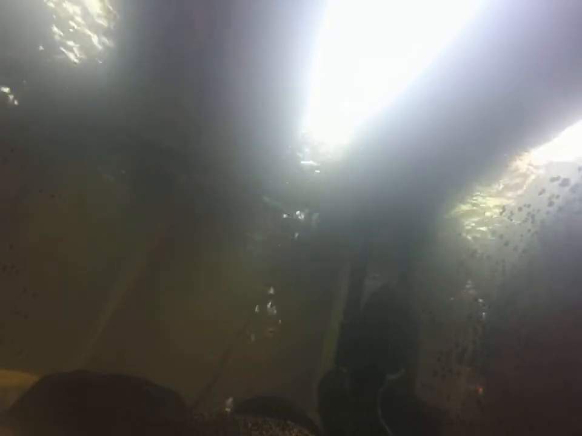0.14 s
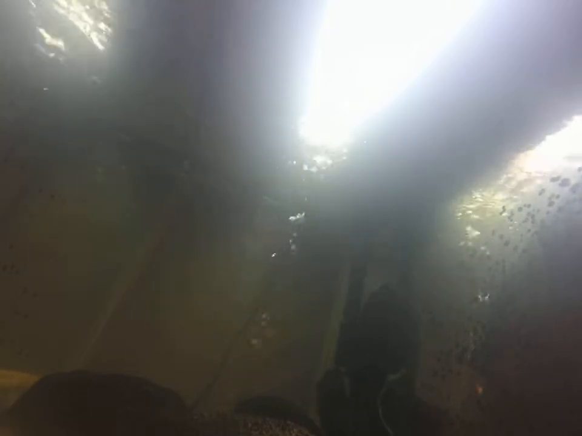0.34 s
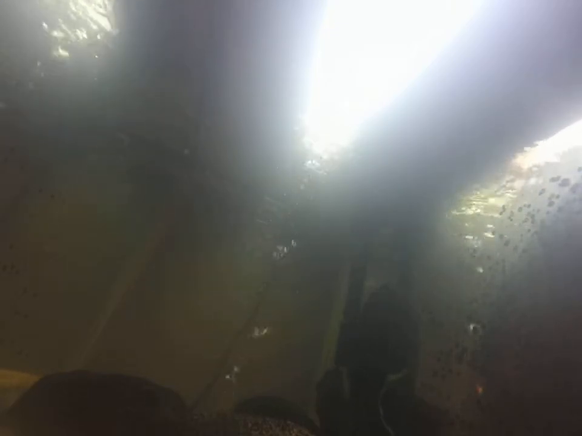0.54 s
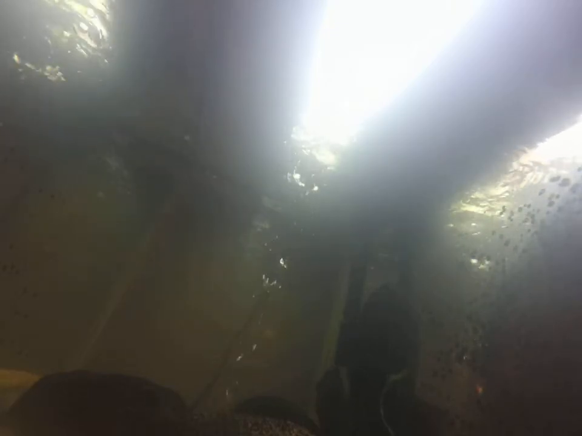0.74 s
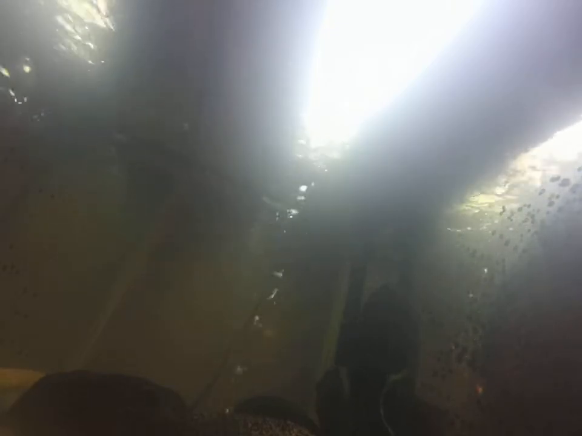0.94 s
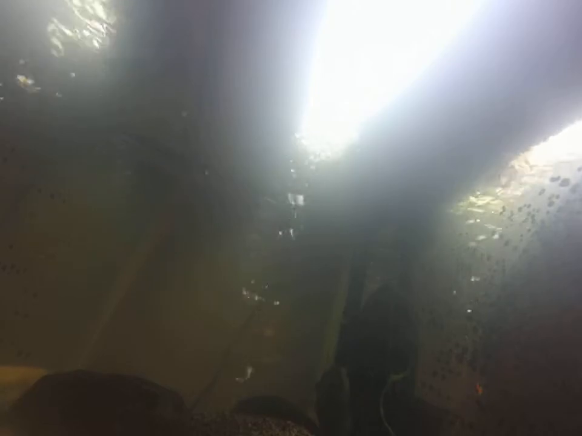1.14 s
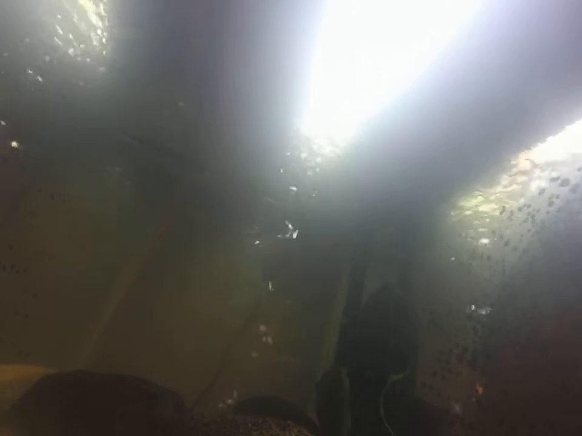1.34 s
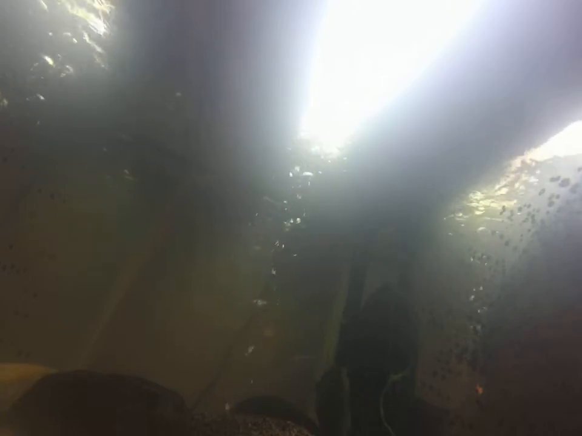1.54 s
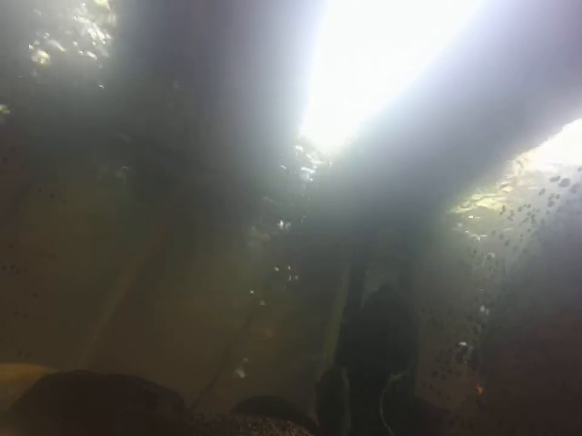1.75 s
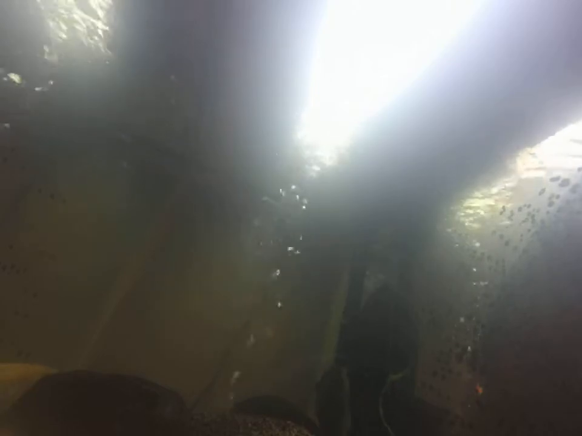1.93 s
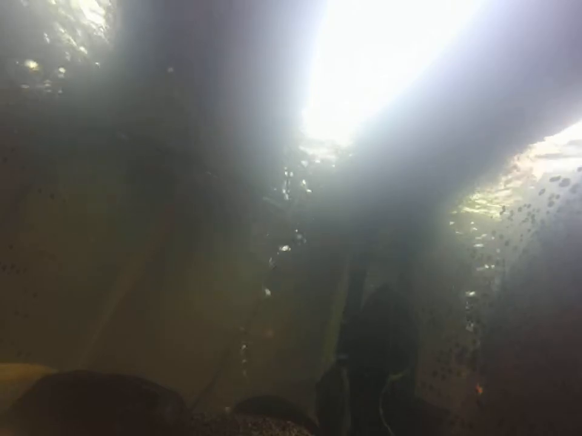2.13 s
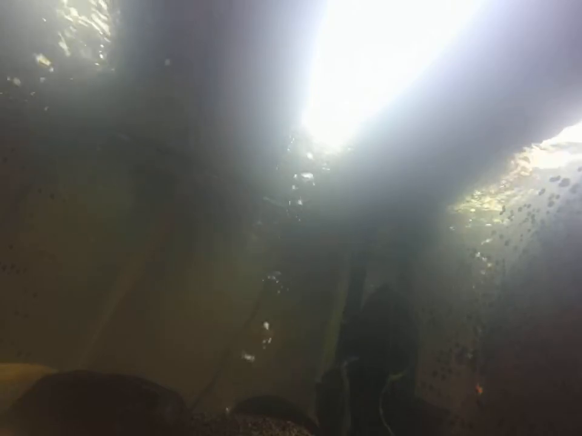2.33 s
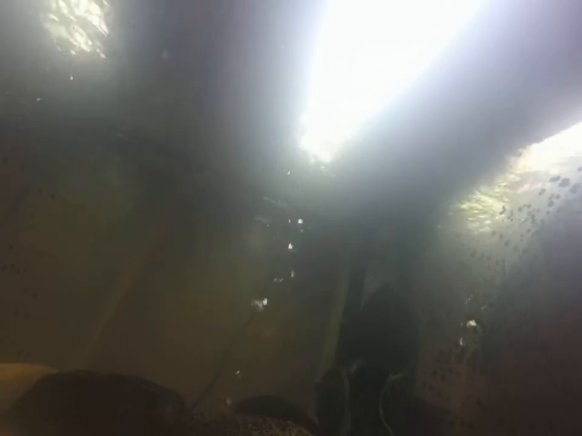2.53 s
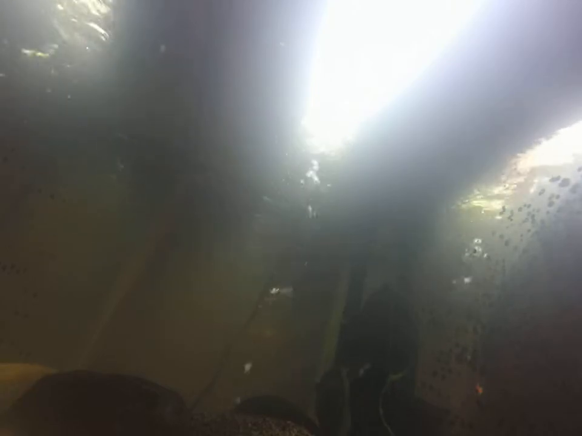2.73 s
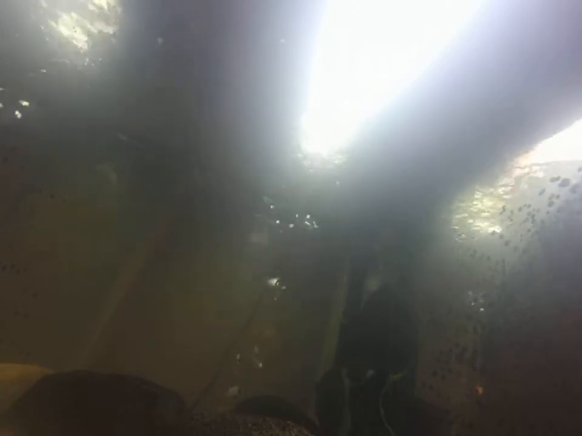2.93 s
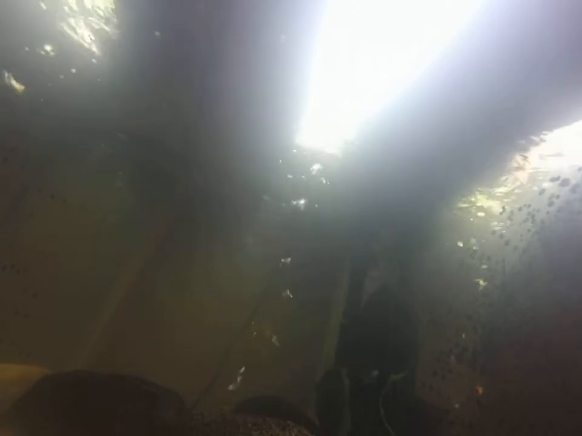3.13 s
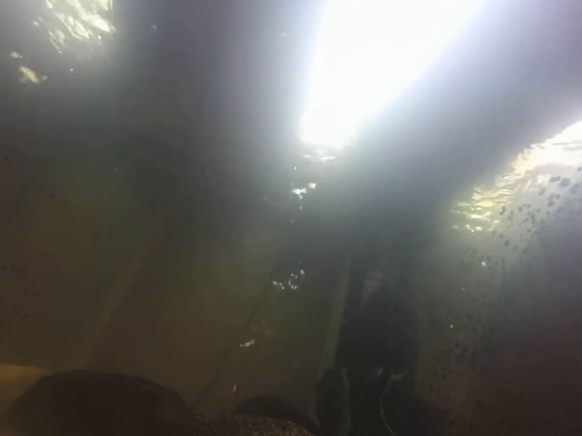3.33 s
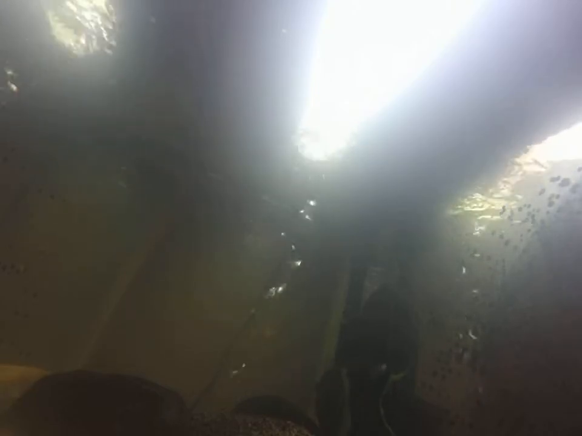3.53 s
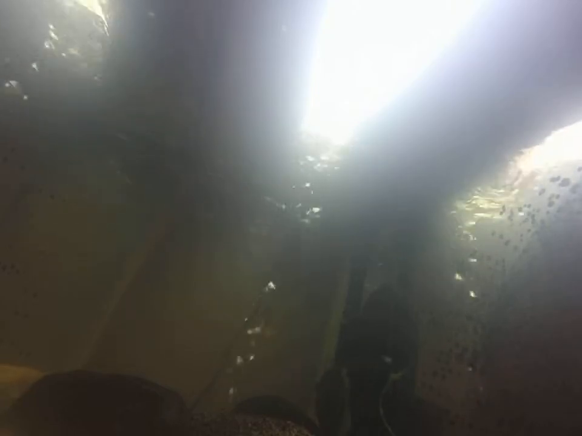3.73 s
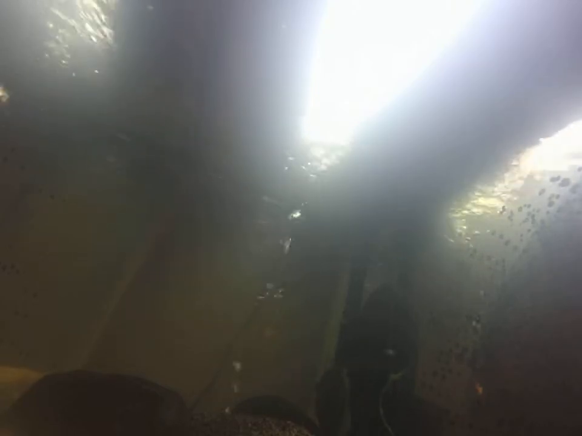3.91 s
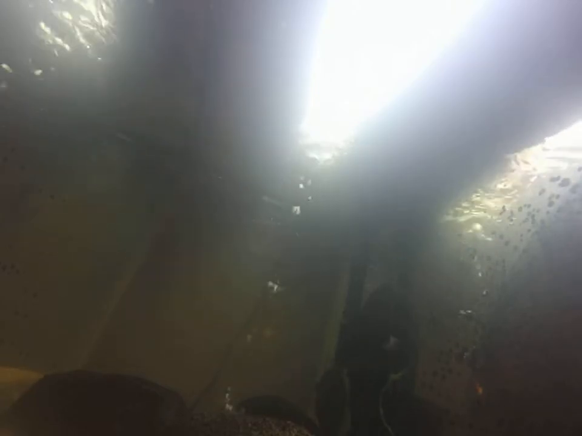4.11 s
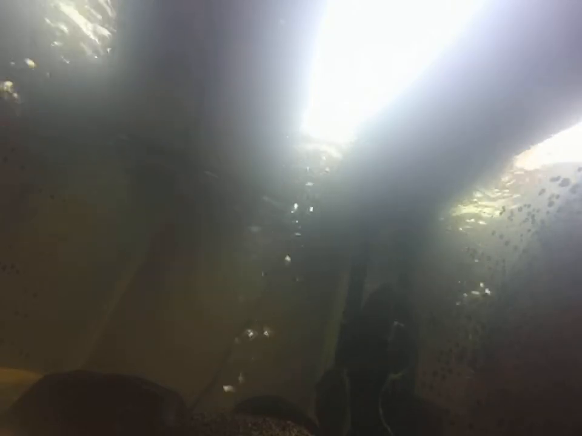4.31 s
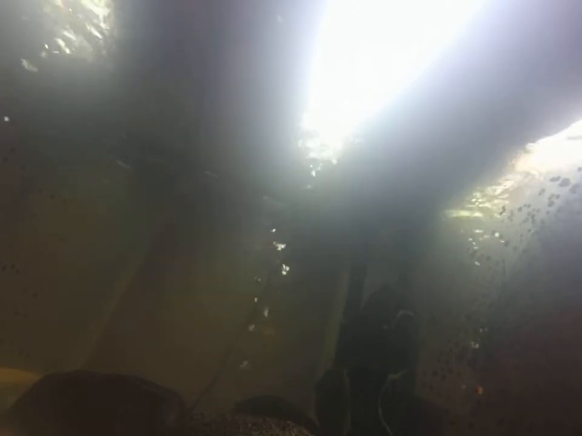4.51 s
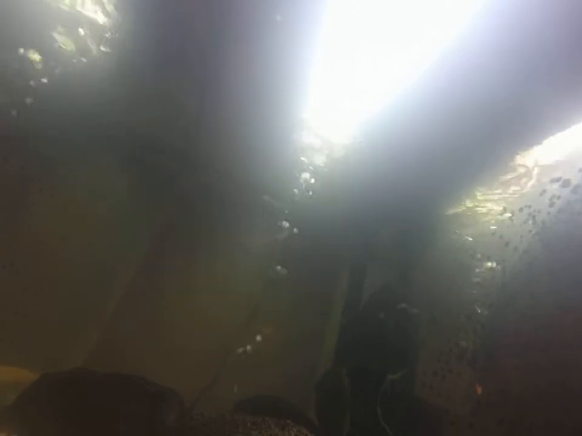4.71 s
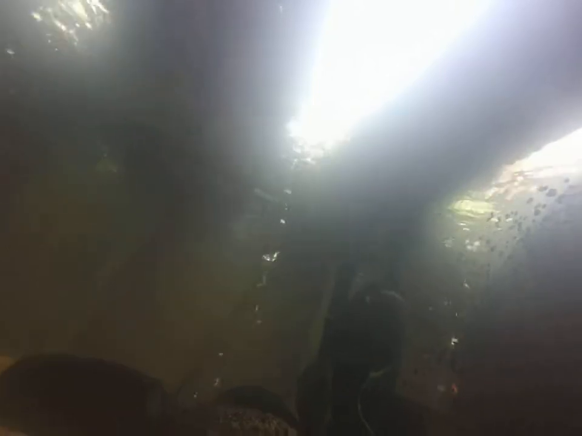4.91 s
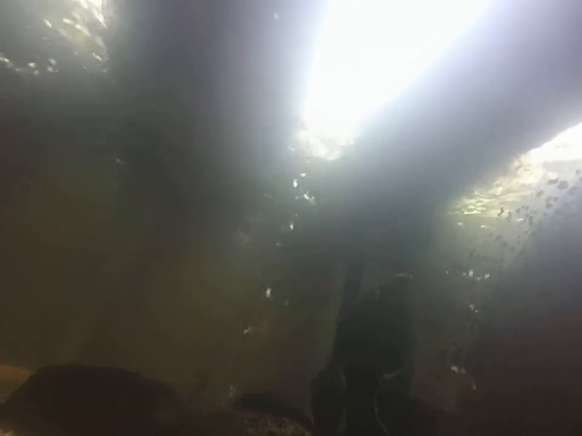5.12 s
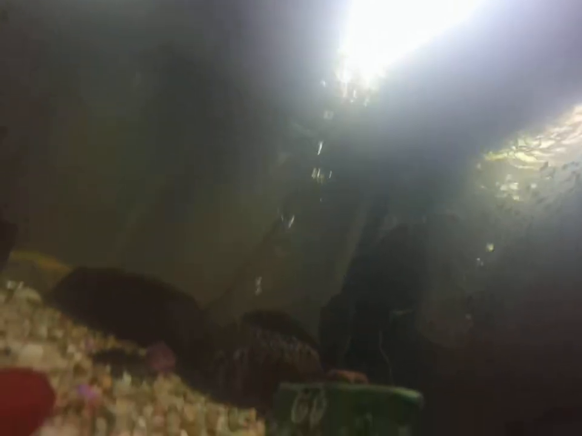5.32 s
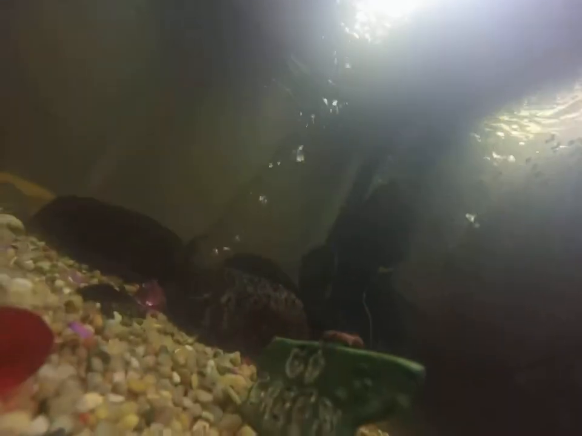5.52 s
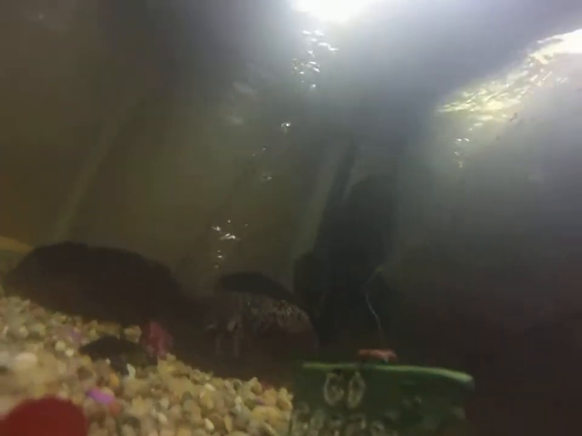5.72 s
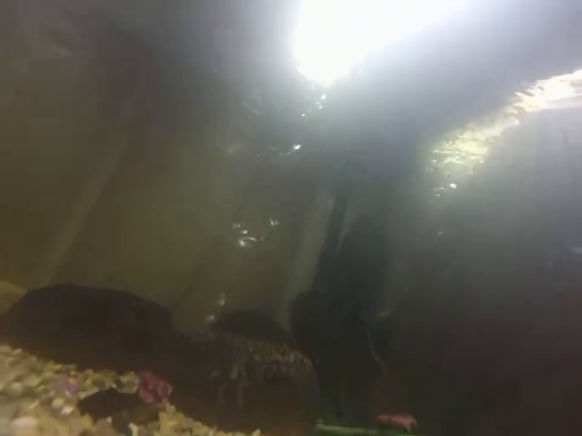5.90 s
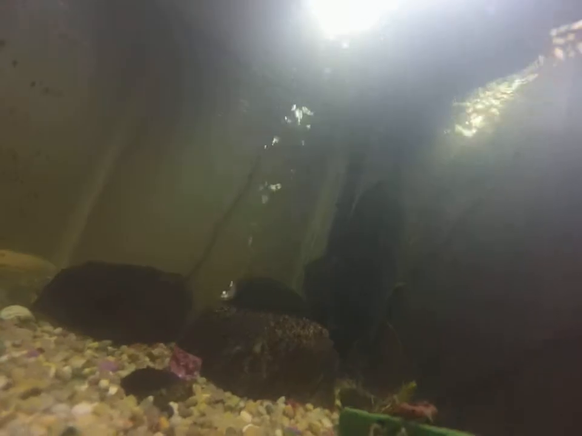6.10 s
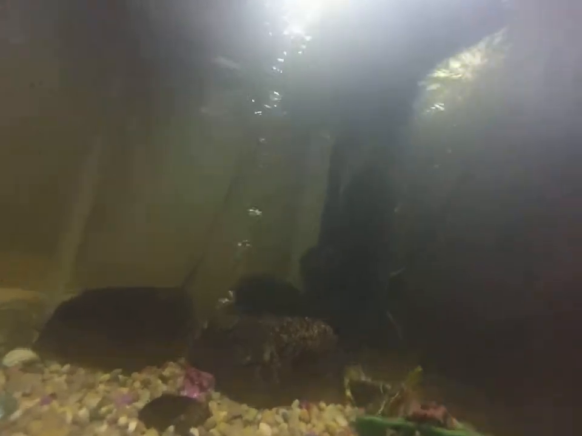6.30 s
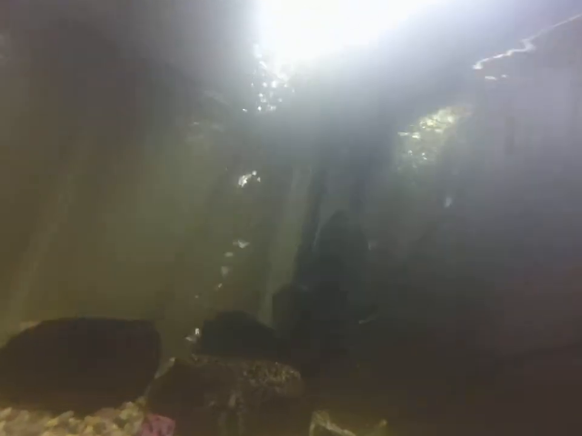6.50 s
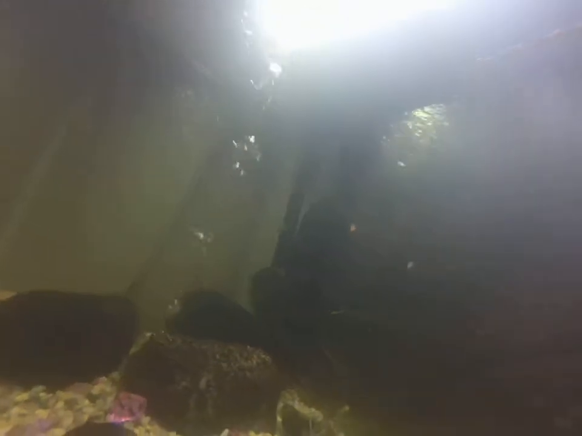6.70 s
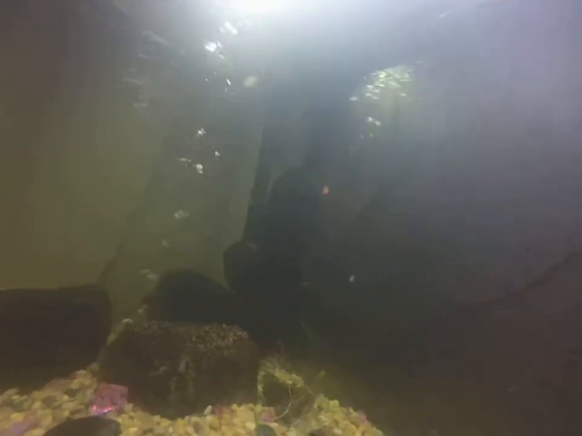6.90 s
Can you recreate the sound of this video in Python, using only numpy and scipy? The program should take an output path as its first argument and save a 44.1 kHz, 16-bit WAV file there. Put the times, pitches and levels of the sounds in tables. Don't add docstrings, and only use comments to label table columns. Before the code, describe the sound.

A microphone in a waterproof case lies on a fish tank's gravel. An air stone releases bright, irregular plinks, with occasional low gurgles, while a pump hums steadily and water rumbles. Soft bumps precede rough scraping and stone clicks, a hard knock chattering down, and a short violent crunch. Afterwards the muted bubbling and hum swell back.

```python
import sys
import numpy as np
from scipy import signal
from scipy.fft import rfft, irfft
from scipy.io import wavfile
from scipy.ndimage import uniform_filter1d

SR = 44100
rng = np.random.default_rng(int(sys.argv[2]) if len(sys.argv) > 2 else 0)


def amplitude_ratio(level_db):
    exponent = np.asarray(level_db, float) / 20
    return 10 ** exponent


def master(y):
    cut = np.clip(np.atleast_2d(y).T, -1, 1)
    pcm = np.round(cut * 32767)
    wavfile.write(sys.argv[1], SR, pcm.astype(np.int16))


N = 306495
TIME = np.arange(N) / SR

# f/Hz, level/dB, t60/s
TANK_MODES = [(2540, -29, 0.026), (3100, -1, 0.028), (3602, -4.5, 0.047), (4370, -2, 0.04),
              (4814, -7, 0.041), (4980, -19, 0.058), (5380, -3, 0.025), (5640, -11.5, 0.074),
              (5940, -14, 0.085), (6280, -2.5, 0.017), (6480, -17.5, 0.05), (6450, -17, 0.02),
              (7110, -15, 0.099), (7700, -19, 0.041), (7830, -11.5, 0.22), (8660, -12.5, 0.034),
              (8790, -8.5, 0.12), (9060, -9, 0.076), (9720, -10, 0.071), (10180, -5.5, 0.11),
              (10700, -25, 0.096), (11700, -6, 0.011), (11900, -28, 0.013), (13300, -13, 0.016)]
# t/s, peak level/dB, f/Hz
LARGE_BUBBLES = [(0.1942, -30.5, 3270), (0.2972, -47, 4500), (0.3775, -31, 2540), (0.4651, -33.5, 5050),
                 (0.746, -34.5, 2540), (0.7798, -21.5, 3870), (1.3774, -31, 4370), (1.5097, -35, 3510),
                 (1.5715, -30, 3100), (1.629, -40, 3100), (1.7291, -31.5, 3330), (2.13, -33, 4370),
                 (2.2695, -29.5, 4750), (2.4555, -37, 4660), (2.599, -34.5, 4720), (2.7177, -27.5, 3840),
                 (2.9526, -27.5, 4100), (3.3228, -36, 5640), (3.4125, -22.5, 4370), (3.442, -36, 3480),
                 (3.4786, -32.5, 3570), (3.5112, -26.5, 3900), (3.8717, -40, 4370), (3.9383, -37, 4300),
                 (3.961, -34.5, 3400), (3.9858, -37, 3500), (4.0579, -31.5, 4240), (4.0927, -39, 4370),
                 (4.1589, -39, 5760), (4.2465, -34, 4850)]
# t/s, peak level/dB, f/Hz
FAINT_BUBBLES = [(0.0772, -45, 5270), (0.2074, -33, 5200), (0.2498, -49, 3100), (0.3444, -43, 5670),
                 (0.5412, -44.5, 3100), (0.601, -41, 4430), (0.6599, -53, 2370), (0.734, -47, 2670),
                 (0.8144, -46, 3620), (0.858, -47, 3100), (0.9057, -42, 5600), (0.952, -42, 2820),
                 (1.0071, -45.5, 2900), (1.075, -44, 3480), (1.1782, -48, 3630), (1.1947, -40.5, 4370),
                 (1.3638, -51, 4370), (1.457, -44, 2640), (1.524, -53, 3000), (1.592, -43, 3150),
                 (1.6636, -41, 3100), (1.6736, -45, 3630), (1.8327, -55, 4440), (1.9066, -45, 4340),
                 (1.964, -51, 3100), (1.9921, -42, 5640), (2.0767, -41, 4250), (2.151, -36, 4760),
                 (2.1794, -41, 3150), (2.2194, -42, 4370), (2.333, -43, 3100), (2.517, -41, 5300),
                 (2.8095, -45, 4450), (3.0006, -38.5, 2830), (3.2777, -44, 5650), (3.2895, -39.5, 3100),
                 (3.466, -41, 3400), (3.5336, -40.5, 2450), (3.6298, -48, 3120), (3.6815, -40.5, 3060),
                 (3.71, -49, 3580), (3.8107, -44, 2900), (4.0396, -47, 4380), (4.2286, -42.5, 3650),
                 (4.415, -44, 5400), (6.0452, -49, 3620), (6.1663, -50, 5280), (6.268, -58, 3100),
                 (6.4418, -47, 2600)]
# t/s, peak level/dB, f/Hz
SMALL_EARLY = [(0.0633, -51, 8840), (0.1073, -39, 9720), (0.1945, -48, 6500), (0.2089, -46, 6300),
               (0.2973, -20, 6600), (0.3364, -36, 7110), (0.3775, -39, 7840), (0.414, -46, 6450),
               (0.469, -39, 6460), (0.5402, -48, 8790), (0.609, -36, 6240), (0.643, -44, 6600),
               (0.688, -48, 6160), (0.7472, -47, 6290), (0.778, -48, 6240), (0.894, -44, 6310),
               (0.9956, -48, 10600), (1.007, -38.5, 11900), (1.076, -33, 6500), (1.188, -36, 8790),
               (1.2323, -41, 9000), (1.3, -38.5, 8790), (1.3756, -45, 6060), (1.3946, -38.5, 9200),
               (1.509, -50, 8930), (1.5454, -40, 9720), (1.834, -42, 6190), (1.9061, -36, 7040),
               (1.993, -55, 6160), (1.9996, -31, 7110), (2.0776, -47, 8830), (2.103, -43, 8600),
               (2.1296, -46, 6220), (2.1465, -42, 7640), (2.1796, -34, 6050), (2.22, -33.5, 7830),
               (2.2692, -43, 6100), (2.314, -43, 8790)]
# t/s, peak level/dB, f/Hz
SMALL_LATE = [(2.314, -46, 8950), (2.376, -38, 6450), (2.456, -44, 6400), (2.514, -48, 6190),
              (2.5732, -47, 9600), (2.5992, -54, 6400), (2.6156, -42, 8790), (2.703, -33.5, 7840),
              (2.7543, -46, 10400), (2.871, -37, 8200), (2.939, -52, 8790), (2.9518, -37, 6480),
              (3.0398, -36, 6700), (3.0786, -54, 8700), (3.18, -37, 10000), (3.201, -30.5, 9230),
              (3.2781, -43, 6460), (3.308, -43, 10400), (3.3869, -54, 7850), (3.417, -35, 8100),
              (3.5126, -48, 6250), (3.5455, -48, 11000), (3.588, -47, 6210), (3.6094, -41.5, 7700),
              (3.681, -36, 7100), (3.8127, -32.5, 9720), (3.87, -42, 6330), (3.939, -34.5, 6400),
              (4.0286, -46, 9900), (4.041, -41, 7840), (4.0924, -46, 6140), (4.152, -45, 7830),
              (4.172, -32.5, 9560), (4.2289, -42, 6480), (4.3257, -46, 8960), (4.3776, -43, 12000),
              (4.4157, -32, 8790), (4.5118, -48, 8960)]
# t/s, peak level/dB, f/Hz
STIRRED_BUBBLES = [(4.6907, -40.5, 10300), (4.759, -15, 4800), (4.7592, -20.5, 5300), (4.8192, -25, 5480),
                   (4.8074, -28, 6000), (4.8194, -25, 4500), (4.845, -28.5, 5100), (4.9, -28, 4300),
                   (4.961, -28, 5180), (5.226, -42, 3600), (5.483, -36.5, 3100), (5.578, -32.5, 7700),
                   (5.5817, -34.5, 3500), (5.599, -38, 3100), (5.6241, -39, 3370), (5.659, -29.5, 6900),
                   (5.657, -40, 4200), (5.743, -35, 9600), (4.863, -48, 8900), (4.942, -47, 4800),
                   (4.982, -40, 4980), (5.445, -39, 8900), (5.985, -59, 9100), (6.073, -45.5, 8200),
                   (6.217, -45.5, 7500), (6.395, -57.5, 5830), (6.2144, -46, 3100), (6.2985, -41, 5300),
                   (6.3117, -36.5, 5540), (6.3745, -40.5, 6280), (6.3763, -33, 4370), (6.922, -34, 2620),
                   (6.4982, -38, 4000), (6.5004, -41.5, 7500), (6.5856, -44.5, 11700),
                   (6.642, -40.5, 11100), (6.6709, -36.5, 4370), (6.758, -39, 4360), (6.764, -38.5, 8600),
                   (6.919, -34, 4260)]
# t/s, peak level/dB, f/Hz
CLOSE_PLINKS = [(1.2032, -50, 2320), (5.2787, -23, 2770), (1.592, -51, 1430), (1.999, -48, 3100),
                (2.237, -46, 3100), (2.41, -51, 3100), (2.43, -47, 4370), (2.454, -45, 3000),
                (2.61, -47, 2880), (3.414, -37, 3600), (3.449, -52, 2100), (3.466, -48, 2500),
                (3.652, -50, 5430), (3.757, -47, 5400), (3.79, -49.5, 3050), (3.872, -42, 5000),
                (3.9374, -46, 2520), (3.9843, -49, 2520), (6.5934, -45, 4450), (6.6517, -47, 1595),
                (6.7007, -49.5, 2150), (6.7391, -44.5, 3110), (6.8025, -51, 4310), (6.8384, -53, 4350),
                (6.8653, -49, 2550), (4.8194, -29, 4370), (6.32, -46, 3000), (6.662, -48, 2600),
                (3.0, -44, 2850), (2.132, -35, 4370)]
# t/s, peak level/dB, f/Hz
SURFACE_GLUGS = [(0.079, -41.5, 580), (1.299, -46.5, 597), (1.593, -36.5, 636), (1.769, -41, 608),
                 (2.346, -44, 598), (3.463, -36, 522), (3.686, -38.5, 495), (3.873, -42, 473),
                 (4.175, -39.5, 482), (6.519, -46, 666), (6.584, -40.5, 740), (6.806, -37.5, 660),
                 (6.897, -37.5, 647)]
# t/s, peak level/dB, f/Hz
SURFACE_PLOPS = [(0.1408, -41.5, 1510), (0.3431, -52, 1990), (0.4673, -49, 1820), (1.4207, -52, 1500),
                 (1.6254, -40.5, 1750), (2.128, -47, 1900), (3.2899, -45.5, 1500), (4.549, -44.5, 1410),
                 (6.6527, -43.5, 1850)]

# f/Hz, width/Hz, level/dB
CASE_MODES = [
    (610, 240, -1),
    (1020, 460, 2.5),
    (1420, 600, 3),
    (1900, 1600, -0.5),
    (2800, 700, 3),
    (4550, 1500, -10),
]
# t/s, peak level/dB, case note f/Hz, relative treble level/dB
STONE_CLICKS = [(4.595, -35.5, 1180, -19), (4.632, -35, 1420, -25), (4.712, -24, 1230, -18),
                (4.731, -15, 1310, -12), (4.808, -25, 2600, -6), (4.886, -21, 2340, -5.5),
                (4.915, -30, 2630, 0), (5.336, -24, 2370, -9), (5.043, -32, 2580, 6.5),
                (4.896, -24, 2500, -8), (5.456, -29, 1780, -22), (5.103, -30, 1700, -10),
                (5.081, -20.5, 620, -15), (5.102, -24, 620, -16), (5.143, -18, 620, -30),
                (5.312, -18.5, 680, -16), (4.879, -22.5, 644, -10), (4.964, -17.5, 1340, -11),
                (5.126, -21, 610, -18), (5.175, -21.5, 620, -26), (5.239, -23, 1350, -0.5),
                (5.258, -23, 640, -22), (5.2965, -25, 2090, -1), (5.304, -15.5, 610, -11),
                (5.329, -13.5, 2900, -5.5), (5.345, -15.5, 3020, -22), (4.174, -43, 940, -25),
                (5.489, -28.5, 1470, -13), (5.516, -37, 1450, -23)]
# t/s, peak level/dB, case note f/Hz, relative treble level/dB
STONE_CRUNCH = [(5.7955, -14.5, 1550, -6), (5.8103, -12.5, 1530, -4), (5.8158, -11, 2060, -18),
                (5.8212, -1, 2940, -3.5), (5.8242, -10, 1510, -20), (5.843, -13, 1600, -15),
                (5.8565, -10.5, 1960, -11), (5.8612, 2, 1630, -33), (5.8785, -8.5, 2780, -11),
                (5.903, -29, 1350, -8), (5.911, -21, 2890, -22), (5.9195, -20, 2900, -15),
                (5.9297, -10.5, 1490, -38), (5.952, -17.5, 1140, -35), (5.9595, -26, 1000, -33),
                (5.968, -31, 900, -31), (6.066, -29, 790, -26), (6.075, -25.5, 1233, -22),
                (6.104, -43, 1810, -11), (5.8305, -17, 2900, -8), (5.836, -19, 1700, -6),
                (5.8578, -9, 2200, -10), (5.87, -29, 2500, -8), (5.881, -17, 2600, -10),
                (5.894, -34, 2800, -7)]
# start t/s, end t/s, rms level/dB, relative treble level/dB
GRAVEL_DRAGS = [(4.628, 4.71, -53, -20), (4.7, 4.826, -39.5, -32), (4.877, 4.916, -31, -19),
                (4.915, 4.942, -39, -21), (4.95, 5.06, -42, -18), (5.056, 5.2, -42, -25),
                (5.19, 5.235, -45, -20), (5.25, 5.297, -43, -27), (5.257, 5.269, -31, -15),
                (5.296, 5.33, -30, -16), (5.332, 5.364, -30, -24), (5.452, 5.626, -58, -22),
                (5.82, 5.843, -25, -7), (5.814, 5.824, -27, -12), (5.838, 5.91, -38, -16),
                (5.902, 5.936, -46, -4), (5.93, 5.979, -47.5, -17)]
# t/s, peak level/dB, length of the dip/s
CASE_JOLTS = [(3.683, -19, 0.0019), (3.709, -22, 0.0087), (4.137, -19.5, 0.0058), (4.144, -19, 0.0071),
              (4.162, -23, 0.0041), (4.19, -22.5, 0.012), (4.731, -19.5, 0.0027), (4.882, -15, 0.0031),
              (4.9612, -16.5, 0.0029), (5.012, -13, 0.0072), (5.041, -20, 0.0015), (5.062, -11.5, 0.0049),
              (5.075, -19, 0.0043), (5.098, -10, 0.0032), (5.122, -10, 0.0034), (5.142, -22, 0.0036),
              (5.155, -13, 0.0036), (5.173, -10.5, 0.0043), (5.182, -10, 0.0047), (5.191, -17, 0.0061),
              (5.82, -27, 0.0015), (5.861, -27, 0.0016)]
BOUNCE_TIMES = [
    5.3676,
    5.391,
    5.421,
    5.4497,
]
# level re knock/dB, case note f/Hz, relative treble level/dB, treble lost per knock/dB
BOUNCE_RATTLE = (-21, 936, -6, 5)
# start t/s, end t/s, deep swirl level/dB, low swirl level/dB
HAND_WASH = [
    (3.663, 3.777, -29, -41.5),
    (4.153, 4.287, -33.5, -41.5),
    (4.71, 5.002, -53, -37),
    (4.97, 5.204, -30, -31.5),
    (5.236, 5.38, -45, -35.5),
]

# f/Hz, level per Hz/dB
FLOW_SPECTRUM = [(15, -51.5), (35, -47), (80, -51.5), (95, -45.5), (110, -45), (165, -40), (200, -51.5),
                 (280, -49.5), (340, -57), (380, -52), (450, -63), (620, -72), (900, -79), (2200, -83.5),
                 (12000, -100)]
# f/Hz, width/Hz, level/dB
WATER_SWAY = (13, 3.3, -45.5)
# f/Hz, width/Hz, rms level/dB
FREE_WATER_NOTES = [
    (100, 19, -49),
    (432, 40, -57),
    (666, 45, -58.5),
]
# multiple, rms level/dB
PUMP_HARMONICS = [
    (1, -36),
    (2, -38.5),
    (3, -38),
    (4, -55.5),
    (5, -56),
]
# t/s, level/dB
RECORDER_GAIN = [
    (0, 2),
    (5.36, 2),
    (5.42, -3.5),
    (5.8, -1),
    (5.83, -23),
    (5.97, -10.5),
    (6.15, -10.5),
    (6.5, -3.5),
    (6.95, -0.5),
]
# bass level/dB, gurgle level/dB
LYING_LEVELS = (-1, 0)
LIFTED_LEVELS = (-4.5, 5)

MAINS_HZ = 59.955
FLOW_DB = -39
LIFT_S, LIFT_TAKES_S = 5.09, 0.36
SMALL_ABOVE_HZ = 5900
CROWDED_ABOVE_HZ, CROWD_SPREAD = 7300, .05
UPPER_WAVES_DB_PER_OCTAVE = -7
BOUNCE_DB, BOUNCE_LOSS_DB, BOUNCE_DIP_S = -0.2, 3, 0.0032


def level(x, db):
    return x * amplitude_ratio(db) / np.sqrt(np.mean(x ** 2))


def band(x, lo_hz, hi_hz):
    return signal.sosfilt(signal.butter(2, [lo_hz, hi_hz], "bandpass", fs=SR, output="sos"), x)


def noise_band(lo_hz, hi_hz):
    return band(rng.standard_normal(N), lo_hz, hi_hz)


def walk(rate):
    k = int(SR / rate)
    held = np.repeat(rng.standard_normal(N // k + 1), k)
    return uniform_filter1d(uniform_filter1d(held, k), k)[:N]


def add(out, s, grain, db):
    i = max(int(s * SR), 0)
    out[i:i + len(grain)] += (grain * amplitude_ratio(db) / np.abs(grain).max())[:N - i]


def ring(hz, t60, t, glide=0.):
    return np.sin(2 * np.pi * hz * t * (1 + glide * t / t60)) * np.exp(-np.log(1000) * t / t60)


def swell(t, rise_s):
    return 1 - np.exp(-t / rise_s)


def gate(start, end, rise, fall):
    return np.clip(np.minimum((TIME - start) / rise, (end - TIME) / fall), 0, 1)


def lift(lying, lifted):
    return np.interp(TIME, [LIFT_S, LIFT_S + LIFT_TAKES_S], [lying, lifted])


def bubbles(rows, reach=0.51, skirt_db=-28, place_db=2.5, own_db=-6, spray_db=-1, ring_share=1):
    out, t = np.zeros(N), np.arange(3000) / SR
    hz, db, t60 = np.transpose(TANK_MODES)
    upper = hz > CROWDED_ABOVE_HZ
    spots = hz * (1 + CROWD_SPREAD * upper * rng.standard_normal((12, len(hz))))
    decay = ring_share * t60 * np.where(upper, .33, 1)
    waves = ring(spots[..., None], decay[:, None], t) * swell(t, 0.0005)
    chance = rng.standard_normal((len(rows), 2 * len(hz)))
    grid = np.fft.rfftfreq(len(t), 1 / SR) + 1
    fade = np.exp(-t / 0.0047) + 0.2 * np.exp(-t / 0.0005)
    hiss = rfft(rng.standard_normal((len(rows), len(t))) * fade)
    for k, ((s, peak_db, pitch), c, h) in enumerate(zip(rows, chance, hiss)):
        near = 1 / (1 + (np.log(hz / pitch) / (reach / 2)) ** 2) + amplitude_ratio(skirt_db)
        above_db = UPPER_WAVES_DB_PER_OCTAVE * np.log2(np.maximum(hz / pitch, 1))
        weight = near * amplitude_ratio(db + place_db * c[::2] + above_db) * np.sign(c[1::2])
        own = amplitude_ratio(own_db) * ring(pitch, 110 / pitch, t, glide=0.025 * c[0]) * swell(t, 0.00024)
        r = grid / pitch
        spray = irfft(h * r ** 2 / ((1 - r ** 2) + .35j * r) / (1 + .9j * r) ** 3, len(t))
        spray = amplitude_ratio(spray_db) * spray * np.abs(weight).max()
        add(out, s, weight @ waves[k % len(waves)] + own + spray, peak_db)
    return out


def air_stone():
    rows = np.r_[LARGE_BUBBLES, FAINT_BUBBLES, SMALL_EARLY, SMALL_LATE, STIRRED_BUBBLES]
    is_small = rows[:, 2] >= SMALL_ABOVE_HZ
    large = bubbles(rows[~is_small], reach=0.13, skirt_db=-20.5, spray_db=-3.0, own_db=-15.5)
    small = bubbles(rows[is_small], spray_db=4, ring_share=0.94, own_db=1.5)
    plinks = bubbles(np.array(CLOSE_PLINKS), reach=0.1, skirt_db=-30, spray_db=-5, own_db=2)
    return large + small + plinks


def gurgle():
    out, t = np.zeros(N), np.arange(4000) / SR
    for rows, cycles in ((SURFACE_GLUGS, 58), (SURFACE_PLOPS, 45)):
        for s, db, hz in rows:
            add(out, s, ring(hz, cycles / hz, t, glide=0.053) * swell(t, 0.00073), db)
    return out


def case(x):
    out = 0
    for row, (hz, width, db) in zip(x, CASE_MODES):
        peak = signal.iirpeak(hz, hz / width, SR)
        out = out + amplitude_ratio(db) * signal.lfilter(*peak, signal.lfilter(*peak, row))
    return out


def stones(rows, t60, top_hz, cycles, tick, contact_s):
    out, t = np.zeros(N), np.arange(2600) / SR
    grit = rng.standard_normal((len(rows), len(CASE_MODES) + 1, len(t)))
    touch = swell(t, contact_s)
    fade = touch * np.exp(-np.log(1000) * t / t60)
    tick_fade = fade + tick * touch * np.exp(-t / 0.00039)
    for (s, db, hz, treble_db), g in zip(rows, grit):
        add(out, s, touch * ring(hz, cycles / hz, t) + 0.29 * case(g[1:] * fade), db)
        treble = band(band(g[0] * tick_fade, 2900, top_hz), 2700, top_hz)
        add(out, s, treble, db + treble_db)
    return out


def clicks():
    under_db, note_hz, treble_db, treble_loss_db = BOUNCE_RATTLE
    knocks = [(s, BOUNCE_DB - k * BOUNCE_LOSS_DB + under_db, note_hz, treble_db - k * treble_loss_db)
              for k, s in enumerate(BOUNCE_TIMES)]
    return stones(STONE_CLICKS + knocks, t60=0.044, top_hz=7840, cycles=12.3, tick=14, contact_s=0.00022)


def crunch():
    x = stones(STONE_CRUNCH, t60=0.015, top_hz=13500, cycles=6.1, tick=10, contact_s=0.00015)
    return band(x, 880, 17000)


def drags():
    push = 3.5 * walk(120)
    grit = [rng.standard_normal(N) * amplitude_ratio(push + 5.0 * walk(170) + 4.5 * walk(700))
            for _ in range(len(CASE_MODES) + 1)]
    body = level(case(grit[1:]), 0)
    treble = band(band(grit[0], 2300, 6000), 2700, 7500)
    treble = level(treble + amplitude_ratio(-14.5) * band(grit[0], 6500, 13500), 0)
    out = 0
    for start, end, db, treble_db in GRAVEL_DRAGS:
        out = out + gate(start, end, 0.0026, 0.012) * amplitude_ratio(db) * (body + amplitude_ratio(treble_db) * treble)
    return out


def jolts():
    out = np.zeros(N)
    bounces = [(s, BOUNCE_DB - k * BOUNCE_LOSS_DB, BOUNCE_DIP_S) for k, s in enumerate(BOUNCE_TIMES)]
    lead = 30
    for s, db, dip in CASE_JOLTS + bounces:
        u = np.arange(int(6 * dip * SR)) / (dip * SR)
        pull = -.85 * np.sin(np.pi * np.clip(u, 0, 1) ** 1.4)
        late = np.clip(u - .9, 0, None)
        overshoot = 7.5 * late * np.exp(-late / .35)
        settling = .07 * np.sin(np.pi * np.clip(late / 5, 0, 1))
        shape = np.r_[np.zeros(lead), pull + overshoot - settling]
        for _ in range(2):
            shape = uniform_filter1d(shape, int(dip * SR / 5), mode="constant")
        add(out, s - lead / SR, shape, db)
    return out


def wash():
    deep = level(band(noise_band(21, 51), 21, 97), 0)
    low = level(band(noise_band(81, 388), 63, 640), 0)
    return sum(gate(start, end, 0.028, 0.029) * (amplitude_ratio(deep_db) * deep + amplitude_ratio(low_db) * low)
               for start, end, deep_db, low_db in HAND_WASH)


def fizz(per_s=150, db=-59):
    c = rng.random((int(per_s * N / SR), 3))
    peak_db = db - 3.0 * np.log(c[:, 1] + .012)
    rows = np.c_[c[:, 0] * N / SR, peak_db, 2300 * 5.2 ** c[:, 2] ** 1.5]
    murmur = 0
    for hz, _, t60 in TANK_MODES[1:4]:
        wave = signal.lfilter(*signal.iirpeak(hz, hz * t60 / 2, SR), rng.standard_normal(N))
        murmur = murmur + wave * amplitude_ratio(4.3 * walk(30) - hz / 300)
    return bubbles(rows, skirt_db=-30.0, own_db=-15.5, spray_db=-6.0) + level(murmur, -80.5)


def unseen_glugs():
    out, t, c = np.zeros(N), np.arange(2500) / SR, rng.random((300, 3))
    for place, size, tone in c:
        pitch = 480 * 1.52 ** tone
        grain = ring(pitch, 35 / pitch, t, glide=0.014) * swell(t, 0.00076)
        add(out, place * N / SR, grain, -58 - 2.28 * np.log(size))
    return out


def flow(bass, open_water):
    hz = np.fft.rfftfreq(N, 1 / SR) + 1
    flow_hz, flow_db = np.transpose(FLOW_SPECTRUM)
    noise = rfft(rng.standard_normal(N)) * amplitude_ratio(np.interp(np.log(hz), np.log(flow_hz), flow_db))
    noise = noise * amplitude_ratio(FLOW_DB) / np.std(irfft(noise, N))
    out, churn, throb = 0, walk(8.9), walk(60)
    edges = [0, 50, 90, 140, 200, 300, 480, 600, 850, 1300, SR]
    for lo, hi in zip(edges, edges[1:]):
        depth = 1. if hi < 1500 else .3
        pulse_db = 2.8 * throb if 200 < hi < 1000 else 0
        churn_db = depth * (0.37 * churn + 2.0 * walk(14)) + pulse_db
        part = irfft(noise * (hz >= lo) * (hz < hi), N) * amplitude_ratio(churn_db)
        if hi <= 200:
            coupling = bass ** 1.5
        else:
            coupling = open_water if hi > 500 else np.sqrt(open_water)
        out = out + part * coupling
    sway_hz, width, sway_db = WATER_SWAY
    sway = level(noise_band(sway_hz - width / 2, sway_hz + width / 2), sway_db)
    return out + sway + open_water * unseen_glugs()


def open_notes():
    notes = 0
    for hz, width, db in FREE_WATER_NOTES:
        note = noise_band(hz - width / 2, hz + width / 2) * amplitude_ratio(2.2 * walk(11))
        notes = notes + level(note, db)
    return notes * lift(0, 1)


def pump(bass, open_water):
    turn = 2 * np.pi * MAINS_HZ * TIME + 1.202
    tones = [amplitude_ratio(db + 0.083 * walk(13.0)) * np.cos(k * turn - np.pi / 2 * (1 - k % 2))
             for k, db in PUMP_HARMONICS]
    return np.sqrt(2) * (bass * tones[0] + sum(tones[1:3]) + open_water * sum(tones[3:]))


def scene():
    gain = amplitude_ratio(np.interp(TIME, *np.transpose(RECORDER_GAIN)))
    bass, open_water = (amplitude_ratio(lift(*db)) for db in zip(LYING_LEVELS, LIFTED_LEVELS))
    hand = clicks() + crunch() + drags() + jolts() + wash()
    steady = gain * (fizz() + flow(bass, open_water) + open_notes() + pump(bass, open_water))
    return (air_stone() + gurgle() + hand + steady)[None]


def band_limit(x):
    return signal.sosfilt(signal.butter(12, 16810, fs=SR, output="sos"), x)


def record(dry):
    lowpass = signal.ellip(6, .3, 40, 16500, fs=SR, output="sos")
    mix = signal.sosfilt(lowpass, np.clip(dry, -1, 1))
    return band_limit(mix)


dry = scene()
out = record(dry)
master(out)
```